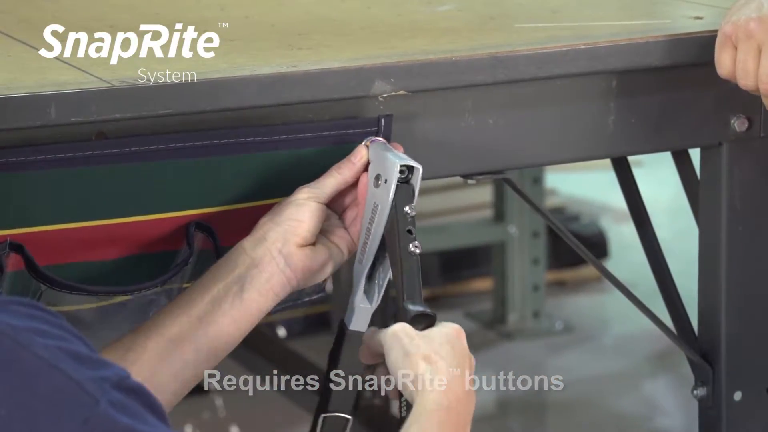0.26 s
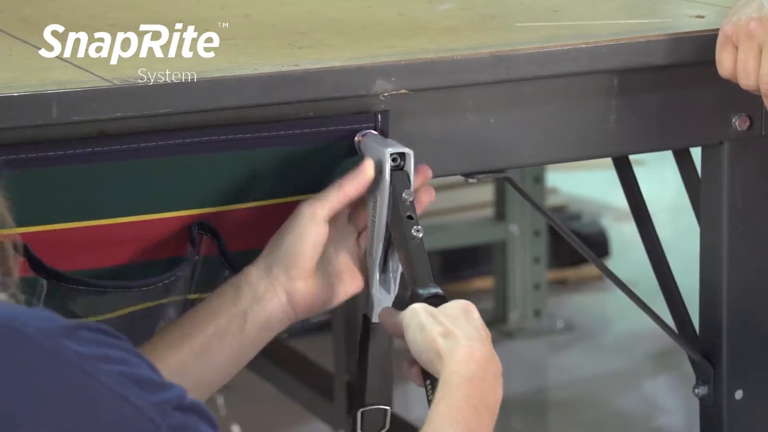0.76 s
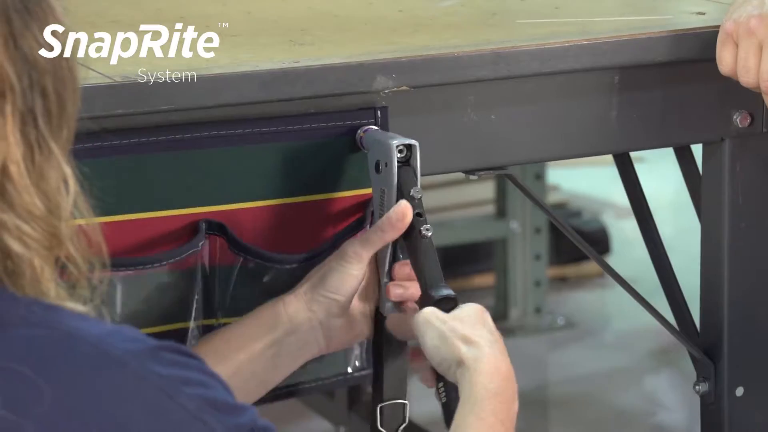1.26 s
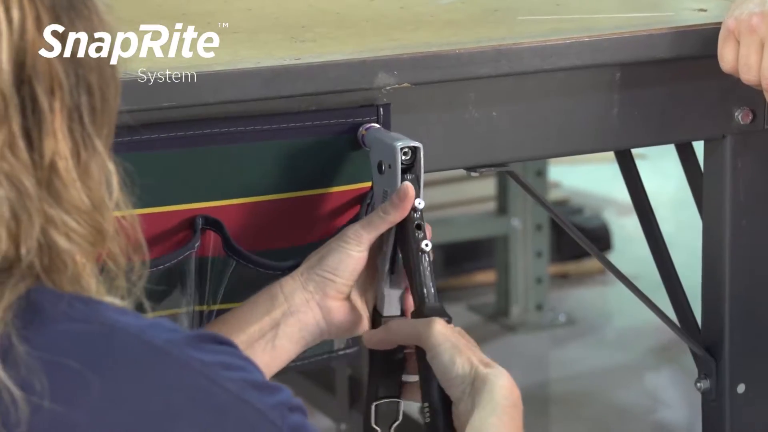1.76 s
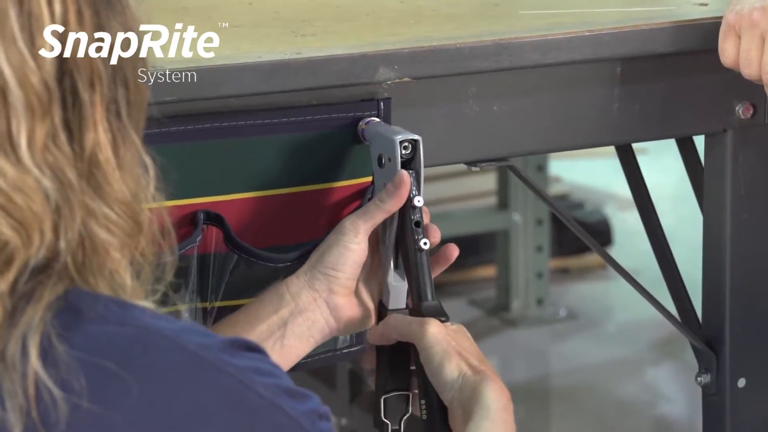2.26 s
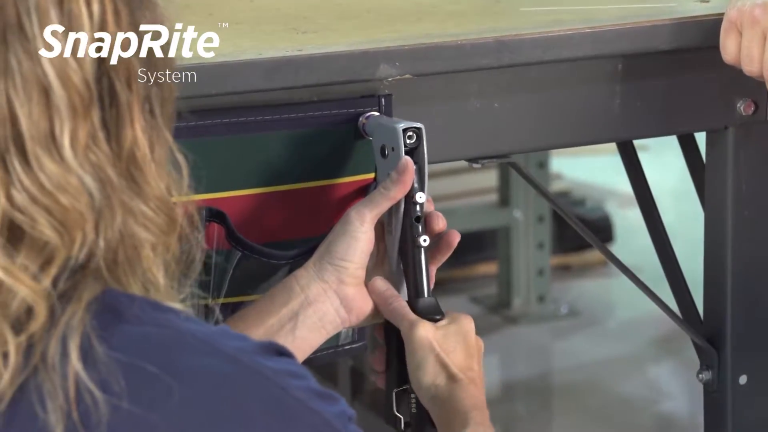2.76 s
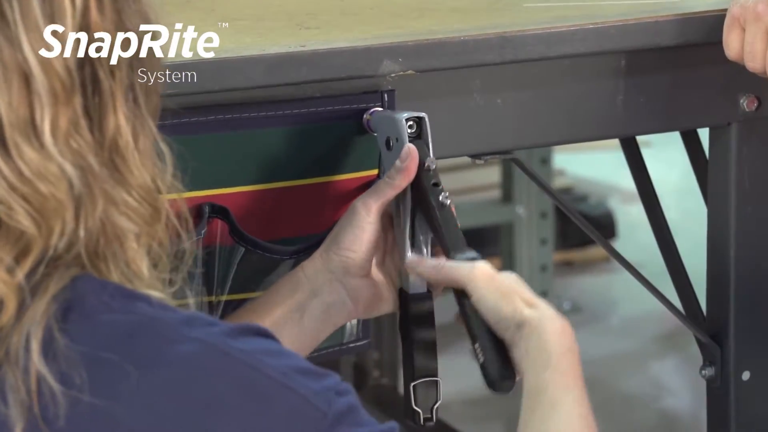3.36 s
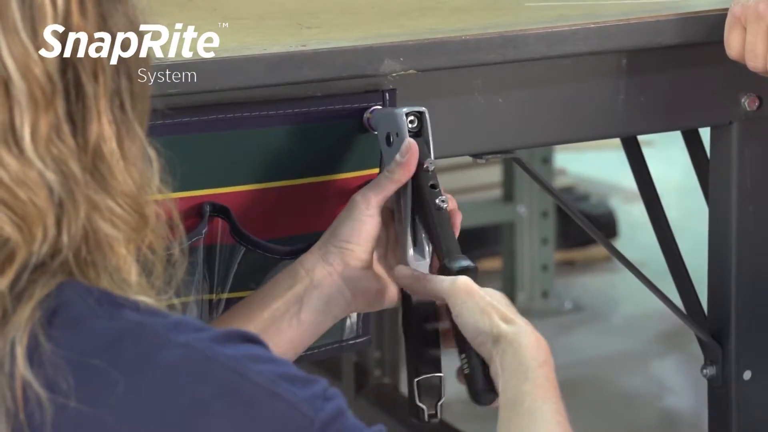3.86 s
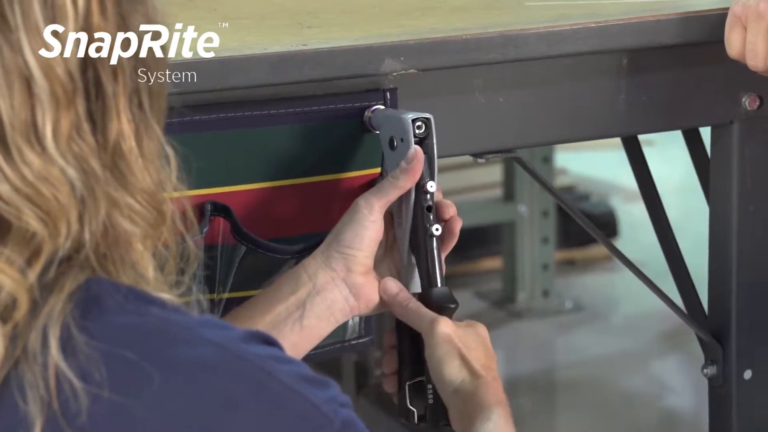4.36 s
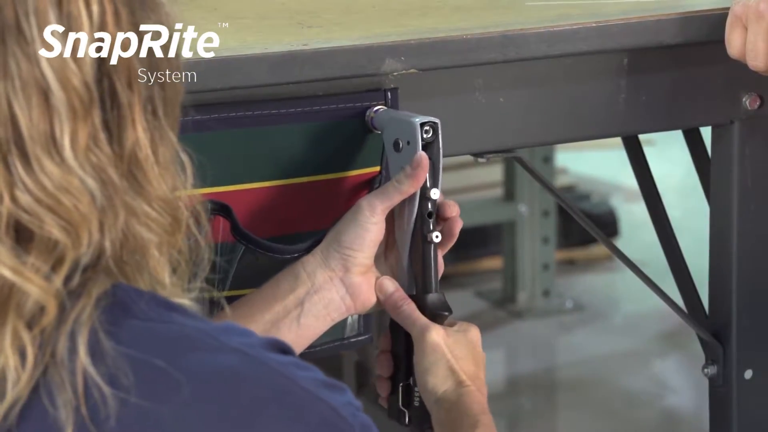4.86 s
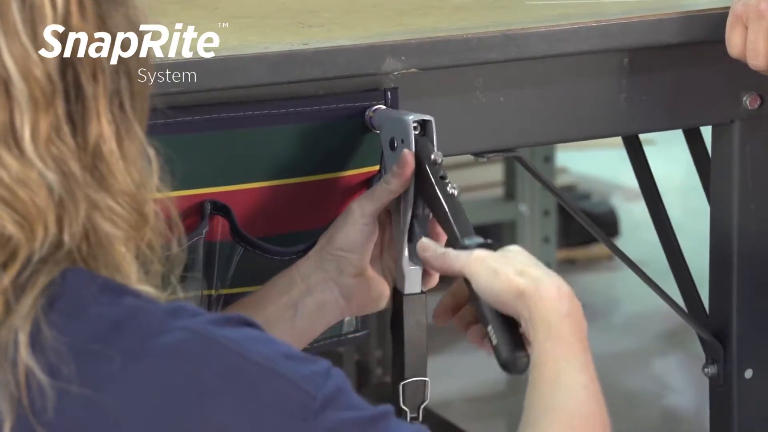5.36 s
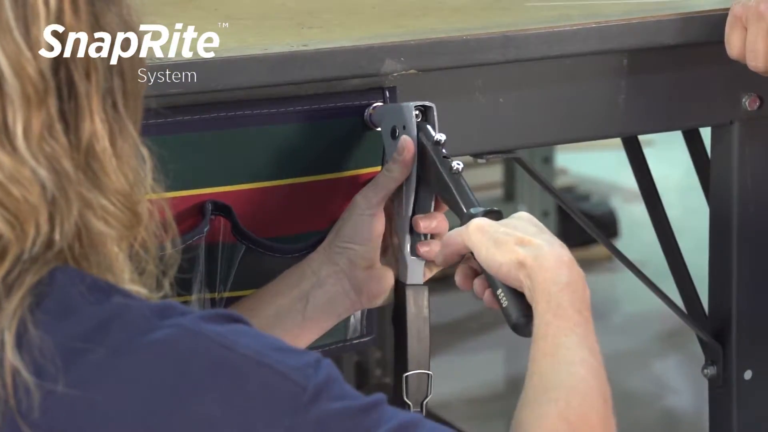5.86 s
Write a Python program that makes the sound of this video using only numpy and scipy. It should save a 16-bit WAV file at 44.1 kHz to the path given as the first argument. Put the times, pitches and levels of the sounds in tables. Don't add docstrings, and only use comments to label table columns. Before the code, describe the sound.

Close to the microphone, a hand riveter ticks faintly against a steel frame, then gives a very loud sharp snap. A second bright double snap follows with a brief handle groan, then lighter clicks, a firm stop hit and loose rattles. Large quiet workroom with low rumble, pulsing hum and faint lamp buzz; something slides far off, and air hisses out at the end.

```python
import sys
import numpy as np
from scipy import signal
from scipy.fft import rfft, irfft
from scipy.io import wavfile

SR = 44100
rng = np.random.default_rng(int(sys.argv[2]) if len(sys.argv) > 2 else 0)


def dump_mix(stems):
    frames = np.atleast_2d(stems).T
    limited = np.clip(frames, -1, 1)
    pcm = np.round(limited * 32767).astype(np.int16)
    wavfile.write(sys.argv[1], SR, pcm)


def volts_from_db(level):
    exponent = np.asarray(level, float) / 20
    return 10 ** exponent


N = 269451

# (frequency [Hz], density [dB per Hz])
AIR_SPECTRUM = [(76, -16), (130, -1.5), (263, -10.5), (328, -7.5), (410, -10.5), (481, -16.5), (511, -14),
                (554, -11.5), (720, -12), (1750, -17.5), (2410, -19), (6470, -26.5), (16000, -49.5)]
# (frequency [Hz], density [dB per Hz])
DUCT_SPECTRUM = [(20, -13), (32, -5.5), (50, 0.5), (70, 5.5), (95, 0), (150, -9)]
# (time [s], hiss [dB], rumble [dB])
DRAUGHT = [(0.0, -57.5, -58.5), (0.4, -55.5, -60.5), (0.8, -57.5, -55), (1.4, -58.5, -61),
           (2.4, -57, -54.5), (3.3, -56, -55), (4.0, -57, -55.5), (5.0, -56, -58), (5.5, -59, -55),
           (6.11, -54.5, -51)]
# (crest time [s], level [dB])
HUM_SURGES = [(0.45, -49.5), (0.89, -44.5), (1.41, -58), (1.87, -48), (2.43, -61), (2.63, -56), (2.9, -66),
              (3.37, -53), (3.69, -58.5)]
# (frequency [Hz], level [dB rms])
LAMP_BUZZ = [(240, -68.5), (480, -73), (600, -85), (1320, -80.5), (1680, -74), (1800, -71.5), (4080, -82.5),
             (4800, -79.5), (5400, -83), (5520, -83.5), (6120, -83), (6600, -78.5), (6720, -83.5),
             (6840, -83.5)]
# (frequency [Hz], density [dB per Hz])
FAR_SPECTRUM = [(150, -2), (300, -6), (900, -1.5), (2500, -7), (5000, -11), (9000, -22.5), (12000, -30),
                (16000, -41)]
# (time [s], rise [s], level [dB], t60 [s], treble [dB])
FAR_PUSHES = [
    (1.93, 0.027, -48, 2.6, -8),
    (2.17, 0.021, -58, 1.5, -9),
    (2.359, 0.039, -40, 0.22, -4.5),
    (2.40, 0.065, -54, 1.6, -3),
    (2.74, 0.065, -61.5, 1.3, -32),
]
# (frequency [Hz], density [dB per Hz])
JET_SPECTRUM = [(3000, -4.5), (4300, -12), (6100, -0.5), (7500, -13.5), (12000, -28), (16000, -41)]
# (frequency [Hz], level [dB], t60 [s])
FRAME_MODES = [(330, -4, 0.26), (454, -6, 0.048), (500, -1.5, 0.15), (742, -3.5, 0.11), (820, -11, 0.06),
               (996, 1.5, 0.11), (1235, -3, 0.026), (1368, -3, 0.07), (1700, -12, 0.051),
               (1950, -6.5, 0.022), (2440, -10, 0.025), (2836, -13, 0.023), (3500, -30, .03),
               (4450, -2, 0.049)]
# (time [s], level [dB], t60 [s], favoured [Hz])
RUBS = [
    (0.05, -60.5, 1, 724),
    (0.41, -54.5, 1, 1080),
]
# (time [s], level [dB], t60 [s], favoured [Hz])
SLIDES = [(0.43, -64, .4, 8900), (0.455, -52, 0.33, 5700), (0.785, -43.5, 0.48, 510),
          (0.84, -41, 0.28, 142), (1.332, -58.5, 0.92, 1700), (1.848, -40, 0.76, 1210),
          (1.85, -40, 0.4, 4750), (3.222, -46, 0.28, 1580), (3.24, -48, 0.96, 330),
          (3.399, -50.5, 0.56, 500), (3.583, -51.5, 0.4, 500), (4.74, -54, .5, 303),
          (4.809, -57.5, 1, 2250), (5.322, -42.5, 0.17, 1400), (5.338, -40, 0.14, 840),
          (5.375, -46.5, 0.54, 486)]
# (time [s], level [dB], hardness corner [Hz], favoured [Hz])
KNOCKS = [(0.748, -35, 5040, 2380), (0.753, -39, 1400, 996), (0.783, -35.5, 2230, 1070),
          (1.904, -28, 6000, 2030), (1.916, -30.5, 4500, 2760), (1.905, -41, 13900, 5600),
          (1.915, -39.5, 1210, 476), (1.930, -40, 5000, 1220), (3.21, -42, 2020, 1230),
          (3.953, -45, 1780, 1680), (4.012, -30, 13500, 5440), (4.022, -39.5, 2110, 1560),
          (4.022, -43.5, 900, 517), (5.080, -46.5, 2500, 2570), (5.083, -46, 1300, 1100),
          (5.140, -38, 1300, 1250), (5.157, -46, 1200, 980), (5.150, -37.5, 594, 216),
          (5.240, -48.5, 2540, 2080), (5.331, -46, 6950, 15600), (5.373, -44.5, 2000, 1160)]
# (time [s], length [s], level [dB], frequency [Hz])
SQUEAKS = [
    (0.471, .012, -54, 5650),
    (1.760, .042, -62, 2950),
    (1.803, .018, -58, 2950),
    (1.862, .03, -34.5, 850),
    (1.953, .024, -45, 3620),
]
# (time [s], peak [dB], first ring [Hz], second ring [Hz], crack [dB])
SNAPS = [
    (0.5089, -35.5, 9050, 6800, 0.1),
    (0.5223, -36, 5700, 4730, 4),
    (0.7480, -4, 4460, 1145, 23),
    (1.9040, -7.5, 14500, 11300, 7),
    (1.9064, -6.5, 11300, 5630, 5),
    (3.9702, -27, 1830, 4060, 4),
    (3.9950, -42, 9200, 6200, 4),
    (4.0226, -18.5, 4200, 2800, -4.5),
    (4.0243, -18, 4440, 14200, 0),
]
# (time [s], peak [dB], first ring [Hz], second ring [Hz])
PINGS = [(0.4915, -44, 6330, 14300), (0.511, -38.5, 6400, 4780), (1.391, -52, 4200, 9450),
         (1.4025, -40.5, 4450, 3450), (1.9084, -17.5, 11300, 2760), (3.2000, -52, 14000, 11000),
         (3.2117, -29.5, 2840, 4080), (3.212, -38.5, 9550, 13650), (3.325, -47, 6060, 10600),
         (3.4620, -57, 11600, 14000), (3.969, -37, 10200, 13400), (4.7285, -52, 14470, 12500),
         (4.8300, -61, 14300, 11500), (5.0795, -30.5, 2750, 4250), (5.0793, -42, 1510, 9500),
         (5.3461, -34.5, 9600, 15500)]
# (time [s], peak [dB], first ring [Hz], second ring [Hz], crack [dB])
RATTLES = [
    (0.785, -25, 6250, 6900, 15),
    (1.3411, -47.5, 3720, 3900, -12),
    (2.5975, -47, 7500, 5470, 1),
    (3.9544, -39.5, 4080, 1750, 3.5),
    (4.0123, -27, 13700, 5320, 1),
    (5.1495, -32.5, 4100, 7300, 15),
    (5.2414, -46, 3740, 2240, -20),
    (5.3735, -34, 3700, 5860, 16),
]

HUM_EARLY_DB, HUM_LATE_DB, SURGE_HALF_WIDTH_S = -63.5, -57, 0.052
WHINE_HZ, WHINE_WIDTH_HZ, WHINE_DB = 11300, 250, -83
VALVE_S, JET_RISE_S, JET_HOLD_S, JET_DB, JET_T60_S = 5.808, 0.024, 0.075, -53.5, 0.8
WASH_LAG_S, WASH_RISE_S, WASH_DB, WASH_T60_S = 0.046, 0.08, -56, 1.5
ROOM_T60_S, ROOM_DB, WALL_CUT_HZ = 0.5, -20, 4500
KNOCK_RISE_S, KNOCK_T60_S, HARD_IS_SHORT = 0.0064, 0.33, 0.24
SLIDE_RISE_S, RUB_RISE_S, CORNER_OVER_FAVOURED = 0.027, 0.083, 1.2
BASS_CUT_SHARE, BASS_CUT_TOP_HZ = 0.24, 310
SNAP_CHATTER_T60_S, PING_CHATTER_T60_S, RATTLE_CHATTER_T60_S = 0.013, 0.02, 0.068
SNAP_WIDTH, PING_WIDTH = 0.17, 0.089
PING_CRACK_DB, SECOND_RING_GAIN = -9, 0.98
MIC_TOP_HZ, MIC_HISS_DB = 16500, -78.5


def rms_one(x):
    return x / np.sqrt(np.mean(x ** 2) + 1e-20)


def peak_one(x):
    return x / np.abs(x).max()


def add(track, s, piece):
    at = round(s * SR)
    track[at:at + len(piece)] += piece[:N - at]


def in_time(rows):
    s, first, *others = np.transpose(rows)
    t = np.arange(N) / SR
    return [np.interp(t, s, first, left=-140, right=-140)] + [np.interp(t, s, c) for c in others]


def drift(rate_hz):
    r = np.exp(-80 * np.pi * rate_hz / SR)
    white = rng.standard_normal(N // 40 + 2002)
    slow = signal.lfilter([1], [1, -2 * r, r * r], white)[2000:]
    return np.interp(np.arange(N) / 40, np.arange(len(slow)), rms_one(slow))


def coloured(spectrum):
    hz, level_db = np.transpose(spectrum)
    log_hz = np.log(np.arange(N // 2 + 1) * SR / N + 1e-3)
    shape = volts_from_db(np.interp(log_hz, np.log(hz), level_db, left=-90, right=-90))
    return rms_one(irfft(rfft(rng.standard_normal(N)) * shape, N))


def swell(s, rise_s, hold_s, t60_s):
    t = np.arange(N) / SR - s
    attack = np.clip(t / max(rise_s, .001), 0, 1)
    return attack * volts_from_db(-60 * np.maximum(t - rise_s - hold_s, 0) / max(t60_s, .01))


def resonate(x, hz, width_hz):
    r = np.exp(-np.pi * width_hz / SR)
    poles = [1, -2 * r * np.cos(2 * np.pi * hz / SR), r * r]
    return signal.lfilter(np.array([1, 0, -1]) * (1 - r * r) / 2, poles, x)


def ring(force, hz, share):
    width_hz = share * hz * np.sqrt(hz / 3500)
    return resonate(resonate(force, hz, width_hz), hz, 3 * width_hz)


def dull(x, corner_hz):
    return signal.lfilter(*signal.butter(2, np.clip(corner_hz, 100, .45 * SR), fs=SR), x)


def grit(size, rough_db):
    slip_gain = volts_from_db(rough_db * rng.standard_normal(size // 24 + 1)).repeat(24)[:size]
    return rms_one(rng.standard_normal(size) * slip_gain)


def hum_gain():
    t = np.arange(N) / SR
    steady = volts_from_db(np.linspace(HUM_EARLY_DB, HUM_LATE_DB, N))
    surges = sum(volts_from_db(level_db) * np.exp(-np.abs((t - s) / SURGE_HALF_WIDTH_S)) for s, level_db in HUM_SURGES)
    return steady + surges


def workroom_air():
    t = np.arange(N) / SR
    hiss_db, rumble_db = in_time(DRAUGHT)
    hiss = volts_from_db(hiss_db + 1.2 + .4 * drift(3.0)) * coloured(AIR_SPECTRUM)
    rumble = volts_from_db(rumble_db + 1.4 * drift(9.9)) * coloured(DUCT_SPECTRUM)
    white = rng.standard_normal(N)
    motor_noise = rms_one(resonate(resonate(white, 128.4, 33.0), 128.4, 33.0))
    hum = 1.04 * np.sin(2 * np.pi * 120 * t) + 0.38 * motor_noise
    buzz = sum(volts_from_db(db + 3.5 + 2.64 * drift(8.1)) * np.sin(2 * np.pi * (hz * t + rng.random()))
               for hz, db in LAMP_BUZZ)
    whine = volts_from_db(WHINE_DB) * rms_one(resonate(white, WHINE_HZ, WHINE_WIDTH_HZ))
    return hiss + rumble + hum_gain() * hum + buzz + whine


def far_sliding():
    noise = coloured(FAR_SPECTRUM)
    low = dull(noise, 6300.0)
    return sum(volts_from_db(level_db) * swell(s, rise_s, 0, t60_s) * (low + volts_from_db(treble_db + 8.0) * (noise - low))
               for s, rise_s, level_db, t60_s, treble_db in FAR_PUSHES)


def far_valve():
    flutter = volts_from_db(JET_DB + 1.2 * drift(25.0))
    jet = flutter * swell(VALVE_S, JET_RISE_S, JET_HOLD_S, JET_T60_S) * coloured(JET_SPECTRUM)
    wash = swell(VALVE_S + WASH_LAG_S, WASH_RISE_S, 0, WASH_T60_S) * coloured(FAR_SPECTRUM[1:5])
    return jet + volts_from_db(WASH_DB) * wash


def workroom(x):
    t = np.arange(SR) / SR
    echoes = rng.standard_normal(SR) * np.minimum(t / 0.023, 1) * volts_from_db(-60 * t / ROOM_T60_S)
    low = dull(echoes, WALL_CUT_HZ)
    echoes = low + (echoes - low) * volts_from_db(-90 * t)
    return signal.fftconvolve(x, echoes / np.sqrt(np.sum(echoes ** 2)))[:N]


def squeaks():
    out = np.zeros(N)
    for s, length_s, level_db, hz in SQUEAKS:
        size = round(length_s * SR)
        narrow = resonate(rng.standard_normal(size), hz, .08 * hz)
        song = rms_one(resonate(narrow, hz, .08 * hz))
        add(out, s, volts_from_db(level_db) * song * np.hanning(size) ** .5)
    return out


def contacts():
    rows = []
    for s, level_db, corner_hz, hz in KNOCKS:
        brief = (corner_hz / 1000) ** -HARD_IS_SHORT
        rows.append((s, KNOCK_RISE_S * brief, level_db, KNOCK_T60_S * brief, corner_hz, hz))
    for table, rise_s in ((SLIDES, SLIDE_RISE_S), (RUBS, RUB_RISE_S)):
        rows += [(s, rise_s, level_db, t60_s, CORNER_OVER_FAVOURED * hz, hz) for s, level_db, t60_s, hz in table]
    return rows


def through_frame(force, sway_db, direct):
    out = direct * force
    for (hz, level_db, t60_s), luck in zip(FRAME_MODES, rng.standard_normal(len(FRAME_MODES))):
        gain = volts_from_db(level_db + 4 + sway_db * np.clip(luck, -2, 1))
        out = out + gain * resonate(force, hz, 3.2 / t60_s)
    return out


def drags_and_knocks():
    out, t = np.zeros(N), np.arange(SR * 3 // 5) / SR
    for s, rise_s, level_db, t60_s, corner_hz, hz in contacts():
        slips = grit(len(t), rough_db=2.6)
        attack = np.minimum(t / max(rise_s, .001), 1)
        fade = volts_from_db(-60 * np.maximum(t - rise_s, 0) / max(t60_s, .01))
        felt = rms_one(dull(slips, corner_hz) + 0.0047 * slips)
        lows = dull(felt, 0.56 * corner_hz)
        force = attack * (fade * lows + fade ** 1.47 * (felt - lows))
        body = through_frame(force, sway_db=2.0, direct=0.7)
        body += 1.62 * resonate(force, hz, 0.11 * hz)
        bass_cut = signal.butter(2, min(BASS_CUT_SHARE * hz, BASS_CUT_TOP_HZ), "high", fs=SR)
        add(out, s, volts_from_db(level_db) * signal.lfilter(*bass_cut, body))
    return out


def clicks():
    out, t = np.zeros(N), np.arange(SR // 10) / SR
    pings = [tuple(row) + (PING_CRACK_DB,) for row in PINGS]
    for rows, t60_s, width in ((SNAPS, SNAP_CHATTER_T60_S, SNAP_WIDTH),
                               (pings, PING_CHATTER_T60_S, PING_WIDTH),
                               (RATTLES, RATTLE_CHATTER_T60_S, PING_WIDTH)):
        for s, peak_db, first_hz, second_hz, crack_db in rows:
            force = .12 * grit(len(t), rough_db=4.0) * volts_from_db(-60 * t / max(t60_s, .004))
            force[0] = -1
            first = peak_one(ring(force, first_hz, width))
            second = SECOND_RING_GAIN * peak_one(ring(force, second_hz, width))
            crack = resonate(force, 3900, 3400.) + .2 * np.diff(force, prepend=0)
            piece = first + second + 1.5 * volts_from_db(crack_db) * peak_one(crack)
            add(out, s, volts_from_db(peak_db) * peak_one(piece))
    return out


def scene():
    tool = squeaks() + drags_and_knocks() + clicks()
    background = workroom_air() + far_sliding() + far_valve()
    return (background + tool + volts_from_db(ROOM_DB) * workroom(tool))[None]


def roll_off(x):
    return signal.sosfilt(signal.butter(12, 16820, fs=SR, output="sos"), x)


def record(dry):
    heard = dry + volts_from_db(MIC_HISS_DB) * rng.standard_normal(dry.shape)
    low_pass = signal.cheby2(10, 60, MIC_TOP_HZ + 500, fs=SR, output="sos")
    mix = signal.sosfilt(low_pass, heard)
    return roll_off(mix)


dry = scene()
out = record(dry)
dump_mix(out)
```